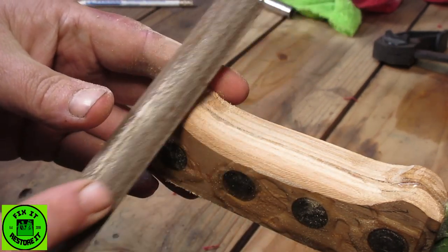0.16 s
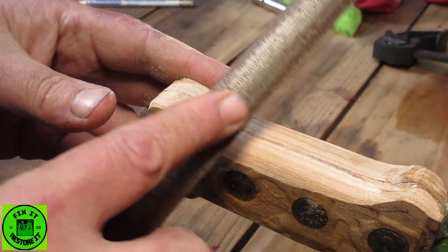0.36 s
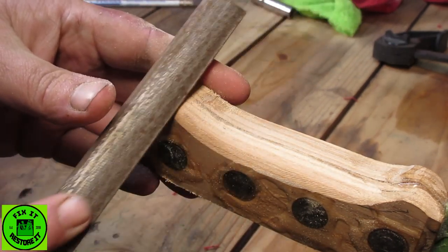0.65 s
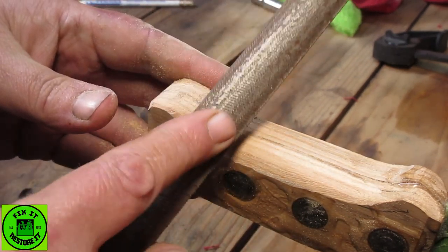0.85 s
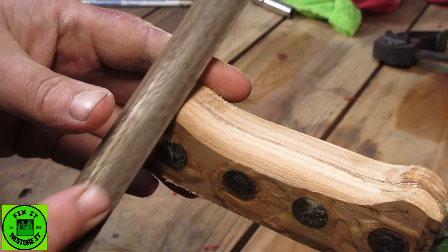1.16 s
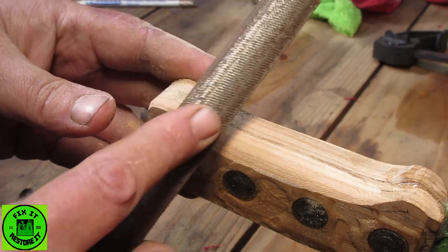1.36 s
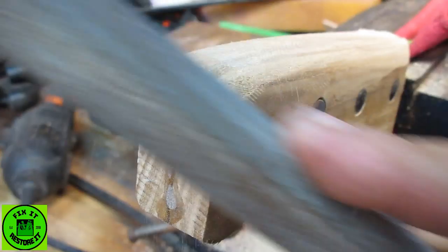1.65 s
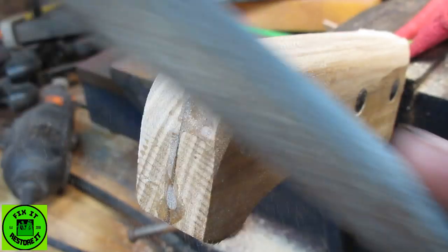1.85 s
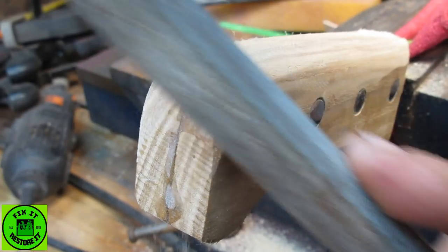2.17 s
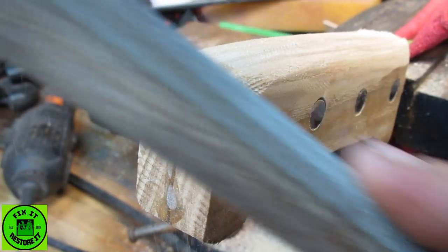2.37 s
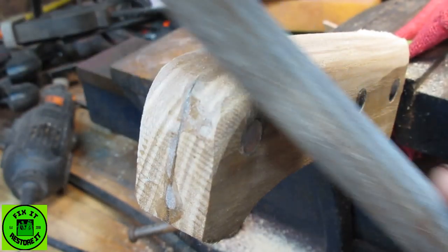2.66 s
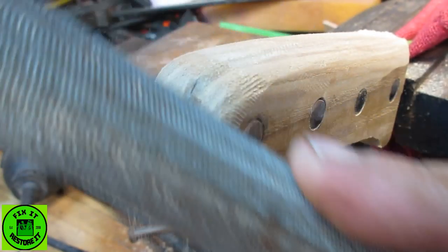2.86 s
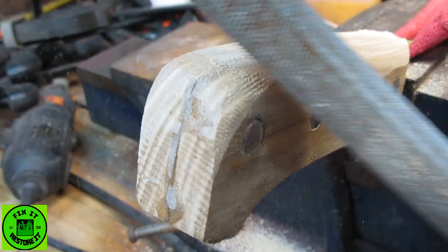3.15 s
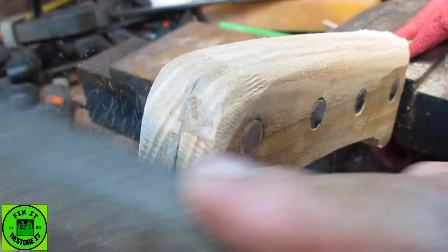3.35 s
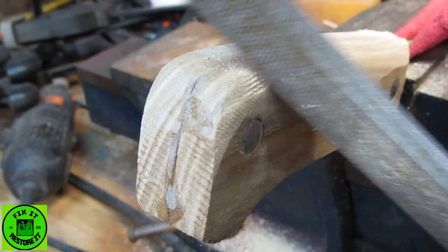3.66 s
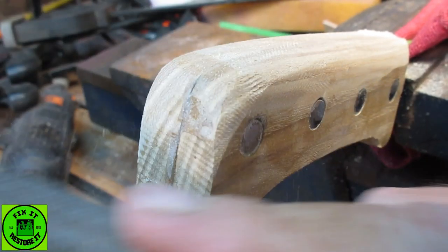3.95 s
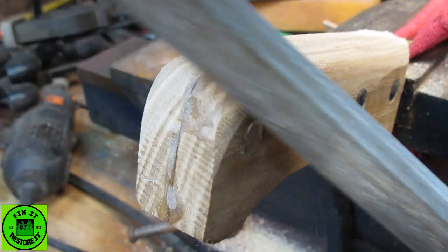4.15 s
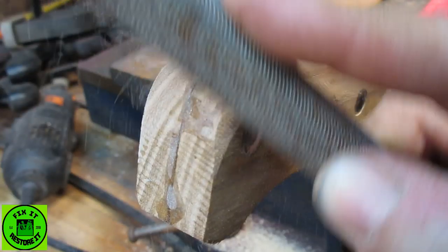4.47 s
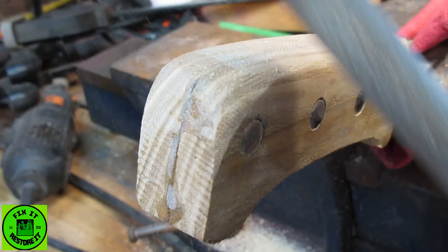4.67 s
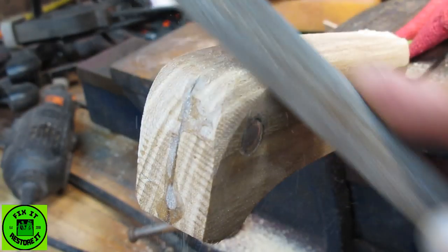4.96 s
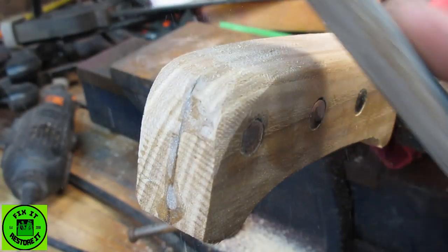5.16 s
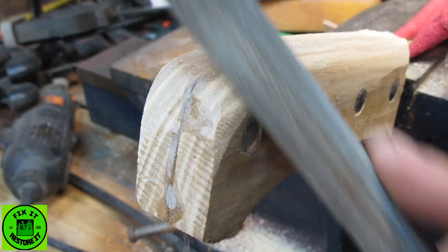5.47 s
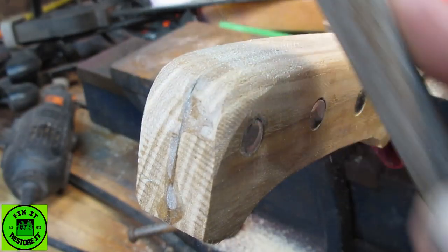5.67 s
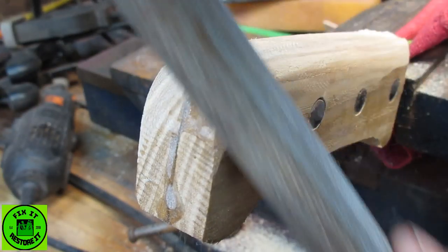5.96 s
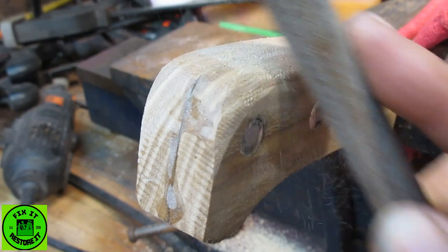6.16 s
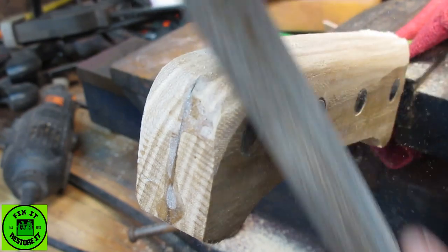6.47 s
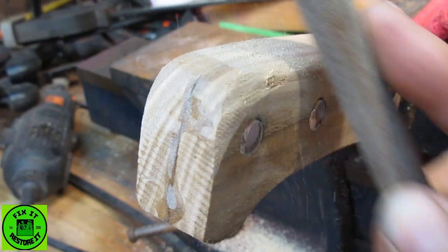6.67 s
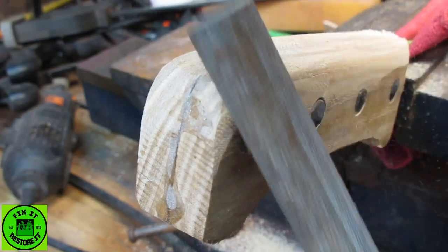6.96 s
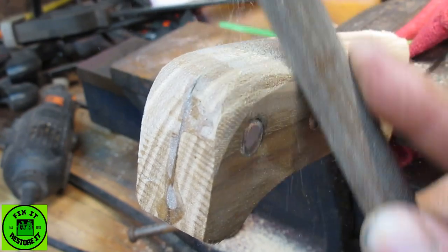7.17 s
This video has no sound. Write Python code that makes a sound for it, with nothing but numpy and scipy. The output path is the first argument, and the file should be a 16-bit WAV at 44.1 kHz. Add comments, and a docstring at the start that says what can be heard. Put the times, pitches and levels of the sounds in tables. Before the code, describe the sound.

Rhythmic one-way filing of wood, heard very near. Three soft, low-level brushing strokes come first, followed by forceful grating strokes on clamped wood, short and separated by brief gaps. Steel knocks, gritty teeth, hollow groaning and splintery catches vary from push to push, while the bench thuds and hums briefly. Short dry room tail, faint dull background hiss.

```python
"""Filing a wooden handle

A hand file works a wooden handle, heard close: three light strokes in the hand, eleven hard ones in a vice.
The file lands with a knock; its teeth then shake, cut and tear the wood at a rate set by the arm's speed.
Teeth are pulse trains and fibres random snaps, both rung through resonances; the groan is two sines.
Snags crack, the bench hums and thuds, and a short room tail and a dull hiss lie behind."""
import sys
import numpy as np
from scipy import signal
from scipy.fft import rfft, irfft
from scipy.io import wavfile
from scipy.ndimage import uniform_filter1d

SR = 44100
rng = np.random.default_rng(int(sys.argv[2]) if len(sys.argv) > 2 else 0)


def log_audio(samples):
    """Write samples as a 16-bit WAV file to the path given in sys.argv[1]."""
    # one column per channel
    frames = np.atleast_2d(samples).T
    # limit to full scale, then quantise
    limited = np.clip(frames, -1, 1)
    pcm = np.round(limited * 32767).astype(np.int16)
    wavfile.write(sys.argv[1], SR, pcm)


N = 322812
TIME_S = np.arange(N) / SR
HZ = np.fft.rfftfreq(8192, 1 / SR)


def amp(db):
    """Decibels to gain."""
    return 10 ** (np.asarray(db) / 20)


def rms(x):
    """Root mean square."""
    return np.sqrt(np.mean(x ** 2) + 1e-20)


def read(points, hz):
    """Spectrum table joined by straight lines on a log-frequency axis."""
    f, value = np.transpose(points)
    return np.interp(np.log(hz + 1), np.log(f + 1), value)


def add(mix, start_s, sound):
    """Mixes a sound in at its start time."""
    part = mix[max(round(start_s * SR), 0):][:len(sound)]
    part += sound[:len(part)]


def wander(n, hz):
    """Low-passed noise of rms 1, cut off at hz."""
    low_pass = 1 / (1 + (np.fft.rfftfreq(n, 1 / SR) / hz) ** 4)
    x = irfft(rfft(rng.standard_normal(n)) * low_pass, n)
    return x / rms(x)


def band(low_hz, high_hz, order=4):
    """Gain of a smooth band-pass."""
    low_cut = 1 + (low_hz / (HZ + 1)) ** (2 * order)
    high_cut = 1 + (HZ / high_hz) ** (2 * order)
    return 1 / np.sqrt(low_cut * high_cut)


def causal(gain):
    """Minimum-phase impulse response of a gain, scaled to a top gain of 1."""
    log_gain = np.log(np.maximum(gain / gain.max(), 1e-5))
    circle = np.concatenate([log_gain, log_gain[-2:0:-1]])
    return np.fft.ifft(np.exp(np.conj(signal.hilbert(circle)))).real[:len(HZ)]


LEAST_LOSS = .019  # least mode width as a share of its frequency


def peaks(modes):
    """Gain of damped resonances, summed in power."""
    power = 0
    for hz, width_hz, db in modes:
        damped_hz = max(width_hz, LEAST_LOSS * hz)
        detuning = (HZ ** 2 - hz ** 2) / (hz * damped_hz)
        below = np.minimum(HZ / hz, 1) ** 2
        power = power + amp(db) ** 2 / (1 + detuning ** 2) * below
    return np.sqrt(power)


def body(modes, colour, colour_db):
    """Gain of resonant peaks over a broad colour."""
    return np.hypot(peaks(modes), amp(read(colour, HZ) + colour_db))


def radiate(force, level_db, gain):
    """A force on a level curve rings through the workpiece."""
    response = causal(gain)
    steady = signal.fftconvolve(force, response)[:len(force)]
    driven = force * amp(level_db) * signal.windows.tukey(len(force), .04)
    return signal.fftconvolve(driven, response) / rms(steady)


def blow(gain):
    """A single sharp push on the workpiece, of peak 1."""
    response = causal(gain)
    return response / abs(response).max()


# Pushes of the file. Each row: start in s, pressure build in s, hold in s, tooth chatter in relative dB,
# rasp of the cut in relative dB, fizz of tearing fibres in relative dB, fastest after s, top mean tooth rate
# in Hz, 1/e half-width of the arm's swing in s, roughness (clipped to 0.01-1), overtones against rasp in dB,
# second harmonic of the groan in dB before resonance, ring of the steel in dB against mean of rasp and fizz.
STROKES = [ (0.15, 0.079, 0.083, -41, -37.5, -51, 0.11, 292.5, 0.12, 0.95, -35, 2, -3),
           (0.71, .07, 0.068, -43, -39, -50, 0.14, 280, .11, 1.03, -23, 2, -2.5),
           (1.21, 0.059, 0.097, -41, -33.5, -47, 0.15, 345.4, 0.12, 0.66, -23, -6, -3),
           (1.585, 0.074, 0.084, -29, -25, -42.5, 0.13, 323.3, 0.07, 0.16, -26, -2.5, -0.2),
           (2.147, 0.069, 0.073, -15.5, -18, -35, 0.094, 339.9, .08, .15, -12, -1.5, -1),
           (2.685, 0.076, 0.075, -18, -20.5, -39.5, 0.094, 314.7, .097, 0.28, -3, -4, -0.7),
           (3.253, 0.024, 0.092, -22, -23, -41, 0.097, 398.4, 0.081, 0.33, -6.5, -9, -0.4),
           (3.762, 0.039, 0.076, -22.5, -24.5, -41.5, 0.11, 303.7, 0.073, 0.45, -15, -14, 3),
           (4.3, 0.043, .14, -28.5, -26, -46, 0.15, 551, 0.073, 0.33, -4, -22, 4),
           (4.885, 0.052, 0.11, -24.5, -22.5, -41, .115, 269.7, .095, .5, -18, -6, -0.8),
           (5.435, 0.064, 0.091, -26.5, -18, -36, 0.1, 366.5, 0.082, 0.43, -8, -6, 2.2),
           (5.978, 0.065, 0.071, -18, -14.5, -35, 0.077, 377.7, 0.078, 0.48, -20, 6, 3),
           (6.51, 0.12, 0.045, -20, -17, -37, .085, 309, .115, 0.37, -13, 9.5, 0),
           (7.045, 0.064, 0.095, -20.5, -17.5, -35.5, .12, 470.6, 0.12, .45, -10, -19, 0.2), ]
SLOW_TOOTH_HZ = 158.04  # mean tooth rate far from the middle of the swing
RELEASE_S = .14  # run-out after the pressure eases
STEEL_FADE_DB, OVERTONES_GROW_DB = 3, 6  # change over the held part


def stroke(row, gain, firmness, groan_db, shake_db, rasp_db, fizz_db):
    """One push: teeth shake the handle, cut the wood and tear its fibres; returns start and sound."""
    start, build, hold, *strength, fastest, top_hz, swing, rough, overtones_db, second_db, steel_db = row
    t = np.arange(0, build + hold + RELEASE_S, 1 / SR)
    chatter_db, rasp_curve_db, fizz_curve_db = (
        np.array(strength)[:, None] + effort(t, start, build, hold, firmness))
    rough = np.clip(rough, .01, 1)
    # -0.5 to 0.5: steel rings early, overtones grow late
    progress = np.clip((t - build) / hold, 0, 1) - .5

    # arm speed is one bell; its tremble grows with roughness
    tremble, pressure = wander(SR // 2, 50)[:len(t)], wander(SR // 2, 30)[:len(t)]
    speed = SLOW_TOOTH_HZ + (top_hz - SLOW_TOOTH_HZ) * np.exp(-((t - fastest) / swing) ** 2)
    rate = speed * (1 + .07 * rough * tremble)
    turns = np.cumsum(rate) / SR

    # a clean groan settles in, with loose shaking around it
    settling = np.minimum(t / build, 1) ** 0.77 * signal.windows.tukey(len(t), .06)
    groan_level = amp(chatter_db + groan_db + 6.2 * rough * pressure) * settling
    groan = np.sqrt(1 - rough ** 2) * rocking(turns, rate, second_db) * groan_level
    loose = fibres(turns, per_s=5400, spread_db=-0.5, bite=0.27)
    shake = rough * radiate(loose, chatter_db + shake_db, gain * band(150, 670))

    # even bites give overtones; uneven bites and snapping fibres give the rasp
    even = teeth(turns, jitter=0.033 * rough, spread_db=1.9 * rough)
    overtones_curve_db = rasp_curve_db + overtones_db + OVERTONES_GROW_DB * progress
    overtones = radiate(even, overtones_curve_db, gain * band(520, 1500, order=3))
    uneven = teeth(turns, jitter=.25 * rough, spread_db=5.0)
    cut = 0.65 * uneven + fibres(turns, per_s=4500, spread_db=0.0, bite=0.29)
    rasp = radiate(cut, rasp_curve_db + rasp_db + 1.8 * pressure, gain * band(655, 2175))
    dust = fibres(turns, per_s=12000, spread_db=5.0, bite=0.28)
    fizz = radiate(dust, fizz_curve_db + fizz_db + 0.69 * pressure, gain * band(4650, 17000, order=6))

    # steel follows both cut and tearing, so it already sounds under a light touch
    steel_curve_db = (rasp_curve_db + fizz_curve_db) / 2 + steel_db - STEEL_FADE_DB * progress
    steel = radiate(cut, steel_curve_db + 1.1 * pressure, gain * band(2670, 4850))
    return start, steel + np.pad(groan, (0, len(HZ) - 1)) + shake + overtones + rasp + fizz


# Moments when the bite of the teeth changes. Each row: time in s, 1/e half-width in s, change of chatter
# in dB, change of rasp in dB, change of fizz in dB.
DIGS = [(1.295, 0.035, 9.5, 0, 0), (1.726, 0.025, 15, 6, 5), (2.248, .02, 5, 0, -1),
        (2.286, .008, 4.5, 5.5, -1.5), (2.77, 0.028, 2, -1.5, 1.5), (3.343, 0.019, -6.5, 4.5, 1.5),
        (3.821, 0.028, 1.5, 9, -2), (4.362, 0.011, 3.5, 12.5, -12), (4.477, 0.02, 4.5, 12, 8.5),
        (4.992, 0.014, -9, 10.5, 3.5), (5.121, 0.026, 13, -4, -1), (5.501, 0.01, 12.5, 0, -2),
        (5.652, .014, 11.5, -7, -20), (6.069, 0.014, 3.5, 3, 4), (6.646, 0.017, 6.5, 5.5, 4.5)]


def effort(t, start, build, hold, firmness):
    """Level curves in dB of chatter, rasp and fizz: held chatter and rasp sink while fizz rises."""
    # firmness scales the whole dB curve of chatter and rasp
    chatter = firmness * press(t, build, hold, touch_db=-26, lean_db=-3, fall_db_per_s=263.5)
    rasp = firmness * press(t, build, hold, touch_db=-27, lean_db=-2.5, fall_db_per_s=382.5)
    fizz = press(t, build, hold + 0.0058, touch_db=-17, lean_db=4.5, fall_db_per_s=536.5)
    digs = 0
    for dig_s, width_s, *change_db in DIGS:
        digs = digs + np.outer(change_db, np.exp(-((start + t - dig_s) / width_s) ** 2))
    return np.array([chatter, rasp, fizz]) + digs


def press(t, build, hold, touch_db, lean_db, fall_db_per_s):
    """Level in dB under the hand: builds from a light touch, leans up or down while held, falls away."""
    held = np.interp(t, [0, build, build + hold], [touch_db, -lean_db / 2, lean_db / 2])
    return held - fall_db_per_s * np.maximum(t - build - hold, 0)


GROAN_FROM_HZ = 192  # at slower tooth rates the handle hardly rocks
ROCKING_HZ, ROCKING_WIDTH_HZ = 542, 200  # rocking resonance


def rocking(turns, rate, second_db):
    """The handle rocks once a tooth if they come fast, and twice where that meets its resonance."""
    first = 1 / np.sqrt(1 + (GROAN_FROM_HZ / rate) ** 8)
    detuning = 2 * (2 * rate - ROCKING_HZ) / ROCKING_WIDTH_HZ
    second = amp(second_db) / np.sqrt(1 + detuning ** 4)
    wave = first * np.sin(2 * np.pi * turns) + second * np.cos(4 * np.pi * turns)
    return np.sqrt(2 / (1 + second ** 2)) * wave


def teeth(turns, jitter, spread_db):
    """One push per tooth, uneven in time (jitter in tooth periods) and in size."""
    at = np.flatnonzero(np.diff(np.floor(turns)) > 0)
    late, size = rng.standard_normal((256, 2))[:len(at)].T
    place = at + jitter * late / (turns[at + 1] - turns[at])
    index = np.clip(np.round(place).astype(int), 0, len(turns) - 1)
    pushes = np.zeros(len(turns))
    pushes[index] = amp(spread_db * np.clip(size, -2, 2))
    return pushes / rms(pushes)


def fibres(turns, per_s, spread_db, bite):
    """Tiny snaps of wood fibre, strongest just after each tooth bites (bite in tooth periods)."""
    chance, size, sign = rng.random((SR // 2, 3))[:len(turns)].T
    sizes = amp(spread_db * np.minimum(-np.log(1 - size), 3))
    snaps = (chance < per_s / SR) * np.sign(sign - .5) * sizes
    snaps = snaps * (0.51 + np.exp(-(turns % 1) / bite))
    return snaps / rms(snaps)


# Ringing of file and handle in the hand. Each row: frequency in Hz, width in Hz before the least loss,
# level in relative dB.
HELD_MODES = [(1030, 19, 4.5), (1450, 60, -6), (3280, 160, -14.5), (4170, 67, -13.5), (5360, 130, -22),
              (6390, 46, -21), (7450, 100, -21.5), (8400, 150, -30), (12100, 350, -33)]
# Broad colour between those modes. Each row: frequency in Hz, level in relative dB.
HELD_COLOUR = [(59, -46), (100, -18), (188, 2), (222, -10), (285, -2), (482, -9), (535, 0), (733, -6.5),
               (1400, -12), (1880, -19.5), (3320, -24), (7510, -38.5), (15000, -43.5)]


def held_body():
    """Resonant gain of file and handle in the hand."""
    return body(HELD_MODES, HELD_COLOUR, colour_db=1) * faint_modes(depth_db=4.5)


# Ringing of file and handle in the vice. Each row: frequency in Hz, width in Hz before the least loss,
# level in relative dB.
CLAMPED_MODES = [(555, 17, 3.5), (758.8, 29, 4), (941, 15, 5), (1264, 37, 3.5), (1359, 31, 1.5),
                 (1655, 7.1, 5), (1710, 34, 5.5), (1855, 120, -2), (2755, 39, 4.5), (3862, 64, -0.5),
                 (3962, 39, -7.5), (5300, 35, -17.5), (5520, 39, -27.5), (6970, 42, -17),
                 (7610, 150, -22.5), (8710, 97, -18.5), (10650, 200, -24.5), (12300, 850, -29)]
# Broad colour between those modes. Each row: frequency in Hz, level in relative dB.
CLAMPED_COLOUR = [(60, -62.5), (110, -3), (190, -9), (310, 3), (420, -3), (860, -13.5), (1100, -16.5),
                  (2000, -12), (3400, -16.5), (4100, -10.5), (5000, -24), (9000, -36), (15000, -46.5)]


def clamped_body():
    """Resonant gain of file and handle in the vice."""
    return body(CLAMPED_MODES, CLAMPED_COLOUR, colour_db=4.0) * faint_modes(depth_db=2.5)


def faint_modes(depth_db):
    """Countless weak high modes of the steel, as a random ripple on the treble gain."""
    return amp(depth_db * wander(len(HZ), 800) * band(4500, SR))


# Teeth catching and breaking free. Each row: time in s, level in relative dB.
SNAGS = [(2.246, -15), (2.289, -20), (2.7660, -6), (2.7731, -4.5), (2.7824, -7.5), (3.2900, -12.5),
         (3.3174, -10.5), (3.812, -9.5), (3.8170, -6.5), (4.3594, -4), (4.364, -3.5), (4.373, -8.5),
         (4.3763, -4.5), (4.384, -7.5), (4.4871, -9), (6.106, -5.5), (6.1095, -5), (6.1133, -4.5)]


def snags(gain):
    """Hard cracks where a tooth breaks out of the grain: single blows on the body."""
    out, crack = np.zeros(N), blow(gain * band(900, 3300, order=2))
    for start_s, db in SNAGS:
        add(out, start_s, amp(db + 4.5) * crack)
    return out


# The file set down on the wood. Each row: time in s, knock in relative dB, bright tick in relative dB,
# thump in relative dB.
LANDINGS = [(0.116, -31, -59.5, -36.5), (0.666, -22, -52.5, -27.5), (1.171, -27.5, -58, -40),
            (1.566, -28, -50, -33.5), (2.145, -26, -33, -56), (2.679, -29, -39, -46),
            (3.251, -19, -28, -34), (3.759, -23.5, -37, -38), (4.259, -27, -35.5, -25.5),
            (4.866, -17, -28, -24.5), (5.415, -10.5, -28, -21.5), (5.967, -10.5, -26, -22),
            (6.497, -28, -51, -34.5), (6.991, -18, -35.5, -25)]
# Knock of steel on the held and the clamped wood. Each row: frequency in Hz, width in Hz before the least
# loss, level in relative dB.
HELD_KNOCK = [(357, 89, 8), (788, 130, 2), (1054, 55, 1.5)]
CLAMPED_KNOCK = [(350, 48, 5), (671, 55, 6.5), (1008, 330, -7.5), (1560, 320, -4)]
# mean thump pitch falls as the file settles
THUMP_FROM_HZ, THUMP_TO_HZ, THUMP_SINK_S = 950, 277.4, .02


def landings(rows, knock, gain, knock_db, tick_db, thump_db, rattle_s, thump_s):
    """Steel knocks on wood with a falling thump and rattles briefly before it grips."""
    out, t = np.zeros(N), np.arange(SR // 16) / SR
    clack = blow(peaks(knock) * band(220, 2200, order=3))
    tick = blow(gain * band(2500, 14000))
    sinking = THUMP_TO_HZ + (THUMP_FROM_HZ - THUMP_TO_HZ) * np.exp(-t / THUMP_SINK_S)
    for start_s, db, bright_db, weight_db in rows:
        bounces = rng.standard_normal(len(t)) * (rng.random(len(t)) < 900 / SR)
        contact = 0.89 * bounces * np.exp(-t / rattle_s)
        contact[0] = 1
        turns = np.cumsum(sinking * (1 + .25 * wander(len(t), 300))) / SR
        thump = np.sin(2 * np.pi * turns) * np.exp(-t / thump_s)
        add(out, start_s, amp(db + knock_db) * signal.fftconvolve(contact, clack))
        add(out, start_s, amp(bright_db + tick_db) * signal.fftconvolve(contact * np.exp(-t / 0.006), tick))
        add(out, start_s, amp(weight_db + thump_db) * thump)
    return out


# Slow modes of vice and bench. Each row: frequency in Hz, level in relative dB, t60 in s.
BENCH_MODES = [(184.3, 2.5, 0.17), (256.8, -3, 0.55), (503, -6, 0.4)]


def bench(x, ring_db):
    """Vice and bench hum on after the stroke: decaying cosines convolved with it."""
    t = np.arange(SR // 2) / SR
    ring = 0
    for hz, db, t60_s in BENCH_MODES:
        decay = amp(-60 * t / t60_s)
        ring = ring + amp(db) * 2 * decay / decay.sum() * np.cos(2 * np.pi * hz * t)
    return amp(ring_db) * signal.fftconvolve(x, ring)[:N]


def thud(x, thud_db):
    """The weight of the work shakes the bench: low noise following the short-term level."""
    load = np.sqrt(abs(uniform_filter1d(x ** 2, size=2000)))
    rumble = signal.fftconvolve(rng.standard_normal(N), causal(band(41, 140, order=2)))[:N]
    return amp(thud_db) * load * rumble / rms(rumble)


# Decay of the room. Each row: frequency in Hz, t60 in s.
ROOM_DECAY = [(150, 0.25), (600, 0.22), (2000, 0.096), (6000, 0.12), (15000, 0.11)]


def workshop(x, wet_db):
    """A short diffuse noise tail whose treble dies sooner than its bass."""
    hz, t, z = signal.stft(rng.standard_normal(SR // 2), SR, nperseg=256)
    decay = amp(-60 * t / read(ROOM_DECAY, hz)[:, None])
    tail = signal.istft(z * decay, SR, nperseg=256)[1]
    tail = tail * np.minimum(np.arange(len(tail)) / SR / 0.01, 1)  # 10 ms onset
    return amp(wet_db) * signal.fftconvolve(x, tail / np.linalg.norm(tail))[:N]


# Hollow resonances of the room noise. Each row: frequency in Hz, width in Hz before the least loss,
# level in relative dB.
ROOM_MODES = [(519, 6.8, -3), (690, 29, -2.5), (1030, 27, -5.5), (1297, 16, -7.5), (1650, 9.3, -11.5)]
# Colour of the room noise. Each row: frequency in Hz, level in relative dB.
ROOM_COLOUR = [(15, -19), (70, 0.5), (135, -9.5), (230, -6.5), (450, -13), (1100, -14.5), (2050, -19),
               (2400, -22), (7900, -33.5), (15000, -44)]
# Mean level of the room noise. Each row: time in s, level in dB.
ROOM_LEVEL = [(0, -55), (1.5, -56.5), (2.05, -51), (2.6, -50), (3.15, -53.5), (4.25, -46.5), (4.65, -55),
              (5.95, -49), (6.3, -60), (6.9, -51.5), (7.32, -50.5)]


def room_noise():
    """A dull, slightly hollow hiss: filtered noise whose level drifts."""
    colour = np.interp(np.fft.rfftfreq(N, 1 / SR), HZ, body(ROOM_MODES, ROOM_COLOUR, colour_db=0))
    hiss = irfft(rfft(rng.standard_normal(N)) * colour, N)
    level_db = np.interp(TIME_S, *np.transpose(ROOM_LEVEL)) + .5 * wander(N, 12)
    return hiss / rms(hiss) * amp(level_db)


CLAMPED_FROM_S = 1.5  # in the hand before, in the vice after


def by_grip(rows):
    """Splits events into those in the hand and those in the vice."""
    held = [row for row in rows if row[0] < CLAMPED_FROM_S]
    clamped = [row for row in rows if row[0] >= CLAMPED_FROM_S]
    return held, clamped


def scene():
    """The handle in the hand, then in the vice, in the workshop."""
    held, clamped = held_body(), clamped_body()
    light_landings, hard_landings = by_grip(LANDINGS)
    light_strokes, hard_strokes = by_grip(STROKES)
    in_hand = landings(light_landings, HELD_KNOCK, held, knock_db=-5.0, tick_db=12, thump_db=-6.5,
                       rattle_s=0.024, thump_s=0.053)
    in_vice = landings(hard_landings, CLAMPED_KNOCK, clamped, knock_db=-10, tick_db=1.0, thump_db=-1.0,
                       rattle_s=0.027, thump_s=.022)
    in_vice = in_vice + snags(clamped)
    for row in light_strokes:
        add(in_hand, *stroke(row, held, firmness=0.74, groan_db=-4.0, shake_db=-2.5, rasp_db=-3.0, fizz_db=2.7))
    for row in hard_strokes:
        add(in_vice, *stroke(row, clamped, firmness=0.93, groan_db=-4.5, shake_db=-4.5, rasp_db=-4.5,
                             fizz_db=1.5))
    near = in_hand + in_vice + bench(in_vice, ring_db=4.0)
    near = near + thud(in_vice, thud_db=-32.5) + thud(in_hand, thud_db=-18.0)
    return (near + workshop(near, wet_db=-10.5) + room_noise())[None]


EDGE_HZ = 15150


def record(dry):
    """The input overloads at full scale; then the band limit."""
    low_pass = signal.firwin(511, EDGE_HZ, window=("kaiser", 9), fs=SR)
    return signal.oaconvolve(np.clip(dry, -1, 1), low_pass[None], "same")


dry = scene()
out = record(dry)
log_audio(out)
```